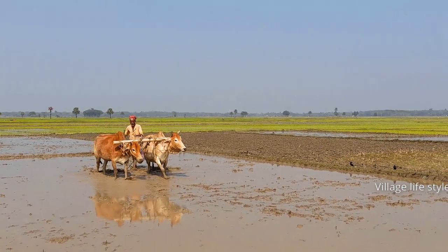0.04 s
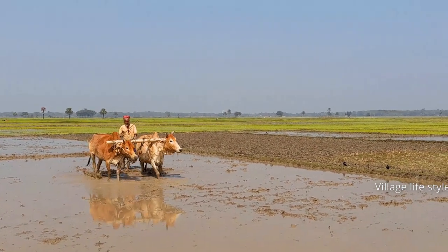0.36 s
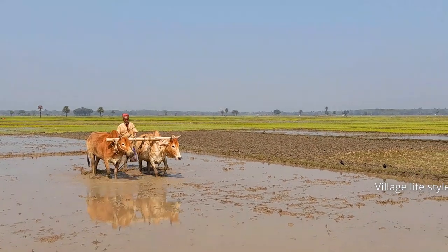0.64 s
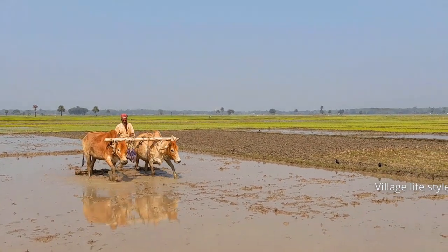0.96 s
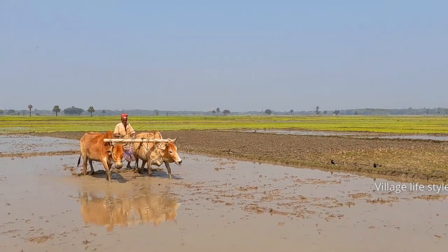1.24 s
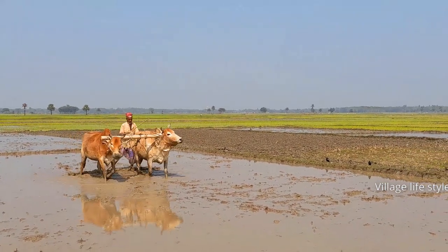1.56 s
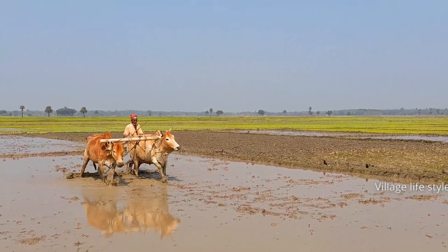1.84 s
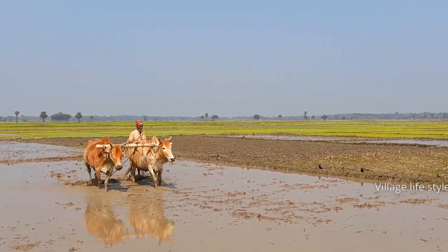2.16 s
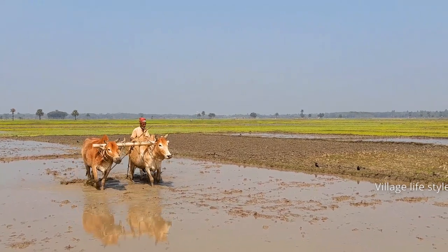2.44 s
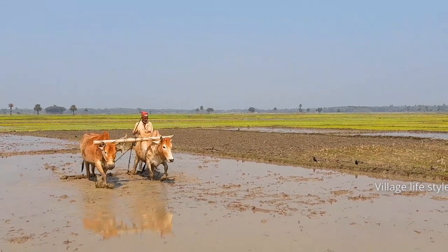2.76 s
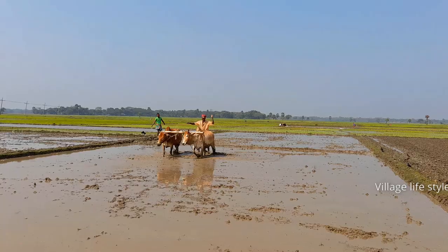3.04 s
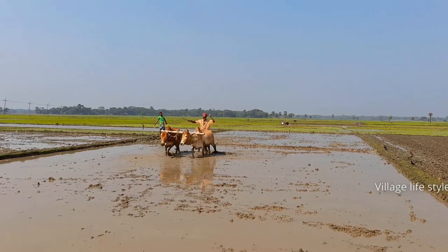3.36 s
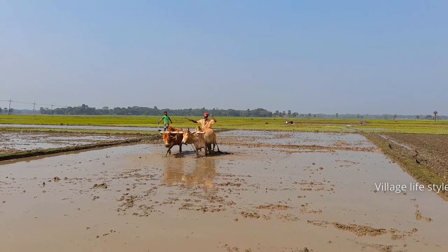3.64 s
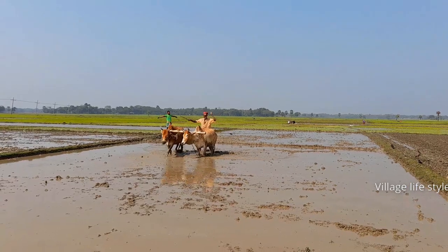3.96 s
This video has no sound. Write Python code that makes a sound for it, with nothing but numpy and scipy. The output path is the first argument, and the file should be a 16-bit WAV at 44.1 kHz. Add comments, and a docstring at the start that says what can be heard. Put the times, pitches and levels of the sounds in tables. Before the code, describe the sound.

Muddy water sloshes softly as oxen pull a plough through a flooded field, with gurgles, plops and wet slaps. Light wind brushes the microphone; after a split-second dropout it rumbles much harder, and wood knocks once.

```python
"""Oxen ploughing a flooded field

Oxen drag a plough through water, some way off to the left, while wind buffets the microphone.
Each hoof stirs up a gurgle of ringing bubbles and a patter of drops; now and then a big bubble plops
or mud slaps. After a split second of silence the scene goes on from a second spot, where the wind
rumbles much harder and wood knocks once."""
import sys
import numpy as np
from scipy import signal
from scipy.fft import rfft, irfft
from scipy.io import wavfile

SR = 44100
rng = np.random.default_rng(int(sys.argv[2]) if len(sys.argv) > 2 else 0)


def store_pcm(level_fs):
    """Save levels as 16-bit WAV."""
    pcm = np.round(np.clip(level_fs, -1, 1) * 32767).astype(np.int16)
    wavfile.write(sys.argv[1], SR, np.atleast_2d(pcm).T)


N = 176400
T = np.arange(N) / SR
FREQS = np.arange(N // 2 + 1) * SR / N
GAP_START_S, SECOND_SPOT_S = 3.063, 3.092


def flooded_field():
    """Direct water sound reaches the left side first; scattered splashing differs on the two sides."""
    # Small bubbles in the spray, larger ones in the gurgle. Each row: pitch in Hz, relative level in dB.
    ping_sizes = [(1000, -3), (1600, 4), (2600, -3), (3700, -2), (6500, -2), (8000, -5)]
    blub_sizes = [(330, 1), (500, 1), (760, 1), (1100, 2), (1300, -8)]
    # Diffuseness of the sloshing. Each row: frequency in Hz, scattered over direct in dB.
    scatter = [(400, -4.5), (750, -6.5), (2000, -3.5), (2900, 6), (3800, -7), (5300, 6), (6400, 15),
               (8500, 20), (15000, 30)]
    # Head start of the direct sound on the left. Each row: frequency in Hz, phase lead in radians.
    lead = [(300, 0), (700, .4), (1000, 1.1), (1300, 2.1), (1580, 1.4), (1850, 3.1), (2200, 6.2),
            (3300, 6.4), (4000, 7.8), (4700, 8.8), (6000, 11.5), (6900, 13), (9650, 21), (15500, 33)]
    # Stereo balance of the water. Each row: frequency in Hz, left over right in dB.
    tilt = [(550, 4), (800, -3), (1300, 0), (1650, -0.5), (2300, 2), (4000, -2), (5200, -8.5), (6500, 3),
            (9000, 9), (12000, -3.5), (15000, -5)]
    spray_gain, gurgle_gain = stirring()
    ahead, left, right = (sloshing(spray_gain, gurgle_gain) for _ in range(3))
    pings = spray_gain * from_db(-3) * bubble_swarm(ping_sizes, per_s=170, cycles=40)
    blubs = gurgle_gain * from_db(-2.5) * bubble_swarm(blub_sizes, per_s=55, cycles=18.6)
    share = from_db(per_bin(scatter))
    total = np.sqrt(1 + share ** 2)
    direct = rfft(ahead) / total + rfft(pings + blubs + plops() + mud_slaps())
    direct = np.array([direct, direct * np.exp(-1j * per_bin(lead))])
    scattered = rfft(np.array([left, right])) * share / total + rfft(mist() + splashes())
    return irfft((direct + scattered) * pan(per_bin(tilt)), N)


def stirring():
    """Envelopes of spray and gurgle: each slosh swells and dies away over a steady trickle."""
    # Hooves and plough stir the water. Each row: peak time in seconds, spray and gurgle levels
    # in relative dB, rise and decay in seconds.
    sloshes = [(0.0094, -47, -68, 0.014, 0.02), (0.145, -54, -47.5, 0.043, 0.026),
               (0.202, -52, -42, 0.017, 0.039), (0.297, -43, -47.5, 0.038, 0.022),
               (0.385, -48, -51, 0.0036, 0.12), (0.4763, -47.5, -54, 0.0091, 0.091),
               (0.585, -47, -48.5, 0.024, 0.03), (0.709, -50.5, -42, 0.019, 0.029),
               (0.7981, -46, -68, 0.066, 0.023), (0.9494, -49, -53, 0.024, 0.11),
               (1.3119, -45, -46.5, 0.039, 0.043), (1.357, -37.5, -49, 0.015, 0.017),
               (1.4094, -46, -73, 0.032, 0.053), (1.5214, -46.5, -73, 0.03, 0.08),
               (1.5805, -46, -43, 0.018, 0.19), (1.6666, -44, -46, 0.014, 0.046),
               (1.7194, -46.5, -67, 0.034, 0.065), (1.8194, -42.5, -67, 0.016, 0.079),
               (1.8692, -41.5, -62, 0.018, 0.032), (2.028, -47, -50.5, 0.06, 0.091),
               (2.1455, -51, -55.5, 0.052, 0.13), (2.2318, -44, -47, 0.043, 0.049),
               (2.288, -43, -46, 0.024, 0.1), (2.3694, -47, -46, 0.039, 0.065),
               (2.4594, -47.5, -48, 0.05, 0.1), (2.5394, -50.5, -52.5, 0.0084, 0.15),
               (2.6594, -45.5, -53, 0.013, 0.11), (2.8185, -48.5, -50.5, 0.046, 0.11),
               (2.9194, -49, -67, 0.056, 0.055), (2.9991, -47.5, -49, 0.049, 0.043),
               (3.0929, -36.5, -44.5, 0.0087, 0.037), (3.1594, -46.5, -49, 0.015, 0.23),
               (3.2755, -45.5, -47.5, 0.049, 0.21), (3.3394, -48.5, -62, 0.048, 0.056),
               (3.3894, -45.5, -45, 0.036, 0.16), (3.4735, -44.5, -54, 0.053, 0.039),
               (3.562, -41.5, -45, 0.017, 0.092), (3.5907, -43, -58, 0.017, 0.047),
               (3.668, -43, -47, 0.022, 0.12), (3.8494, -49, -44, 0.032, 0.064),
               (3.892, -40.5, -41.5, 0.006, 0.024), (3.953, -38, -51, 0.012, 0.046)]
    spray_power = gurgle_power = from_db(-60.5) ** 2  # the trickle
    for s, spray_db, gurgle_db, rise_s, decay_s in sloshes:
        fade = np.maximum((s - T) / rise_s, (T - s) / decay_s)
        swell = np.exp(-np.minimum(fade, 20))
        spray_power = spray_power + (from_db(spray_db - 8.5) * swell) ** 2
        gurgle_power = gurgle_power + (from_db(gurgle_db - 4) * swell) ** 2
    return np.sqrt(spray_power), np.sqrt(gurgle_power)


def sloshing(spray_gain, gurgle_gain):
    """Falling drops make the spray, trapped air the gurgle."""
    # Tone of the spray at each spot, and of the gurgle. Each row: frequency in Hz, gain in dB.
    first_eq = [(500, -39), (1000, 2), (1300, -6), (1620, 9), (1880, 2.5), (2150, 4), (2800, -1.5),
                (3500, 3), (4300, 4), (5200, -5.5), (6000, 0.5), (6800, -1.5), (8400, -14.5), (12000, -12),
                (15500, -21)]
    second_eq = [(500, -15), (1000, -4), (1280, 1), (1600, 10), (2000, 2.5), (2800, -1), (3700, 4.5),
                 (4500, 3.5), (5700, -12.5), (6700, -5), (8400, -19), (12000, -20), (15500, -20)]
    gurgle_eq = [(250, 10), (450, -3.5), (620, -2), (780, 0.5), (920, -5.5), (1150, -2), (1400, -12.5),
                 (2200, -10.5)]
    drops = grains(per_s=5000, spread_db=4.2, cycles=5, low_hz=883, high_hz=16700, count=24)
    drops = drops + 0.41 * unit_rms(clicks(per_s=500, spread_db=4.2))  # broad little cracks
    spray = np.where(T < SECOND_SPOT_S, colour(drops, first_eq), colour(drops, second_eq))
    bubbles = grains(per_s=850, spread_db=3.8, cycles=15, low_hz=318, high_hz=1724, count=26)
    return spray_gain * spray + gurgle_gain * colour(bubbles, gurgle_eq)


def bubble(hz, t60, attack_s=0.00073, rise_per_s=1.5):
    """A bubble rings briefly and rises in pitch as it nears the surface."""
    t = T[:int(np.clip(t60 * SR, 50, SR / 4))]
    envelope = (1 - np.exp(-t / attack_s)) * from_db(-60 * t / t60)
    return envelope / envelope.max() * np.sin(2 * np.pi * hz * t * (1 + rise_per_s * t / 2))


def bubble_swarm(sizes, per_s, cycles, spread_db=4):
    """Bubbles ring at random moments, each with a pitch and strength of its own."""
    out = np.zeros(N + SR)
    pitches, levels = np.transpose(sizes)
    for when, which, luck in rng.random((2000, 3))[:int(per_s * N / SR)]:
        hz = pitches[0] * (pitches[-1] / pitches[0]) ** which
        strength = min(-np.log(1 - luck), np.pi) - 1  # many faint, a few loud
        db = np.interp(hz, pitches, levels) + spread_db * strength
        one = bubble(hz, cycles / hz)
        out[int(when * N):][:len(one)] += from_db(db) * one
    return out[:N]


def plops():
    """Single big bubbles ring out above the gurgle."""
    # Each row: start in seconds, level in dB, starting pitch in Hz, time to fall 60 dB in seconds.
    big_bubbles = [(.05, -44.5, 322, 0.15), (.48, -46, 748, 0.17), (.583, -44, 1164, 0.056),
                   (.745, -45, 720, .035), (.949, -42, 762, 0.051), (.978, -40.5, 633, 0.06),
                   (1.034, -37.5, 1666, 0.023), (1.093, -50, 6500, 0.018), (1.358, -37, 2050, 0.011),
                   (1.708, -46, 1520, 0.071), (1.91, -41, 600, 0.038), (2.44, -47, 735, 0.1),
                   (2.461, -36, 782, 0.057), (2.952, -42, 717, 0.07)]
    out = np.zeros(N + SR)
    for s, db, hz, t60 in big_bubbles:
        one = bubble(hz, t60)
        out[int(s * SR):][:len(one)] += from_db(db) * one
    return out[:N]


def mud_slaps(contact_s=0.0015, low_t60=0.009, high_t60=0.0028):
    """A crack and a short splatter excite damped pockets in the mud: a low pair and a high one."""
    # Slaps of wet mud. Each row: start in seconds, level in dB, low and high resonance in Hz,
    # high over low in dB, time for the splatter to fall 60 dB in seconds.
    hits = [(0.126, -50, 605, 3600, -14, 0.011), (0.147, -37.5, 516, 1590, 15, 0.025),
            (.950, -47, 1230, 6250, 11, 0.025), (1.034, -36, 1200, 3540, 8.5, 0.089),
            (1.094, -37.5, 3590, 6600, 20, 0.024), (1.359, -35, 1570, 3530, -5, 0.026),
            (1.873, -35.5, 1500, 3940, 18, .05), (2.048, -37, 1300, 2330, 5, 0.11),
            (3.0944, -23.5, 1110, 3820, 8, 0.015), (3.336, -41, 675, 1600, -6, 0.037),
            (3.564, -32, 820, 4640, 5, 0.012)]
    out, t = np.zeros(N + SR), T[:SR // 10]
    low_cut = signal.butter(2, 600, "high", fs=SR, output="sos")
    crack = t == 0
    for s, db, low_hz, high_hz, high_db, t60 in hits:
        envelope = (1 - np.exp(-t / contact_s)) * from_db(-60 * t / t60)
        splatter = 0.09 * rng.standard_normal(len(t)) * envelope
        low_phase = 2 * np.pi * low_hz * t
        low = (np.sin(low_phase) - 1.46 * np.sin(1.4 * low_phase)) * from_db(-60 * t / low_t60)
        high = np.sin(2 * np.pi * high_hz * t) * from_db(high_db - 60 * t / high_t60)
        pockets = signal.fftconvolve(crack + splatter, low - high)[:len(t)]
        slap = signal.sosfilt(low_cut, pockets)
        out[int(s * SR):][:len(t)] += from_db(db) * slap / np.abs(slap).max()
    return out[:N]


def splashes(attack_s=0.00066):
    """A hoof breaks the surface and throws a sheet of spray that quickly patters out."""
    # Sheets of spray. Each row: start in seconds, level in dB, decay in seconds.
    sheets = [(.283, -56.5, 0.017), (.947, -47.5, 0.012), (1.358, -45, 0.0063), (1.52, -51, 0.0043),
              (2.226, -47, 0.014), (2.289, -56, .004), (2.918, -51, 0.0071), (3.563, -49, 0.014)]
    # Their bright tone. Each row: frequency in Hz, gain in dB.
    splash_eq = [(1500, -16), (4000, -12), (6600, 3.5), (8400, -10.5), (15500, -13)]
    envelope = 0
    for s, db, decay_s in sheets:
        age = np.maximum(T - s, 0)
        attack = 1 - np.exp(-age / attack_s)
        envelope = envelope + from_db(db) * attack * np.exp(-np.minimum(age / decay_s, 20))
    return envelope * droplets(splash_eq)


def mist():
    """The finest spray is a crackling hiss."""
    # Level of the mist at each spot. Each row: time in seconds, relative level in dB.
    first_levels = [(0.0, -65), (0.12, -74.5), (0.48, -67.5), (0.52, -76.5), (0.8, -63), (0.91, -72),
                    (0.93, -65), (1.14, -78), (1.32, -71.5), (1.9, -66), (1.97, -80), (2.02, -77.5),
                    (2.07, -72), (2.23, -67.5), (2.65, -73), (2.66, -66), (3.01, -68), (3.04, -87)]
    second_levels = [(3.12, -68), (3.374, -65.5), (3.552, -74), (3.562, -62.5), (3.756, -72),
                     (3.994, -68.5), (4.0, -63)]
    # Its airy tone. Each row: frequency in Hz, gain in dB.
    mist_eq = [(4000, -13.5), (7000, 5.5), (9500, 1), (13000, 0), (15500, -5)]
    level_db = np.where(T < SECOND_SPOT_S, in_time(first_levels)[0], in_time(second_levels)[0])
    return from_db(level_db + 3.5) * droplets(mist_eq)


def droplets(eq):
    """Tiny drops land as dense clicks, unrelated on the two sides."""
    return colour(np.array([clicks(per_s=5000, spread_db=4.2) for _ in range(2)]), eq)


def knock(start_s=3.213, left_lag_s=0.00013):
    """One hard contact rings hollow wood, perhaps the yoke; it reaches the right side first."""
    # Modes of the wood. Each row: pitch in Hz, relative level in dB, time to fall 60 dB in seconds.
    modes = [(1250, -3, .01), (1790, 0, .013), (2600, -2, .005), (4550, -2, .004)]
    band = signal.butter(2, [750, 5500], "band", fs=SR, output="sos")
    age = np.clip(T - start_s - np.array([[left_lag_s], [0]]), 0, 0.1)
    wood = sum(from_db(db - 60 * age / t60) * np.sin(2 * np.pi * hz * age) for hz, db, t60 in modes)
    return from_db(-24) * signal.sosfilt(band, wood + 1e-18)


def breeze():
    """Light air brushes the microphone, mostly on the right."""
    # Strength of the breeze. Each row: time in seconds, relative level in dB.
    levels = [(0.0, -50), (0.11, -64), (0.2, -44), (0.45, -69.5), (0.47, -52), (0.81, -50), (0.93, -40),
              (1.04, -55), (1.22, -48), (1.57, -46), (1.65, -38.5), (1.71, -49), (2.0, -53), (2.4, -52),
              (2.76, -67), (2.82, -54), (2.88, -51), (3.03, -53.5), (3.05, -66)]
    # Its soft, low tone. Each row: frequency in Hz, gain in dB.
    breeze_eq = [(20, -32), (40, -3.5), (65, 0), (130, -3), (200, -11), (350, -24.5), (600, -33),
                 (1500, -46)]
    level_db, = in_time(levels)
    return from_db(level_db + 2.5) * pan(-12) * eddies(breeze_eq, lumps_db=3)


def buffets():
    """Short puffs of wind make the microphone flutter, brighter than the breeze."""
    # Each row: peak time in seconds, level in dB, half length in seconds, left over right in dB.
    puffs = [(0.06, -52, 0.02, -14), (0.149, -43.5, 0.026, -15), (0.206, -43.5, 0.015, -15),
             (0.25, -37.5, 0.012, -9), (0.39, -49, 0.015, -13), (0.483, -47.5, 0.034, -24),
             (0.629, -39, 0.019, -2), (0.717, -39.5, 0.0089, -13), (0.838, -36.5, 0.015, 0.5),
             (0.893, -33.5, 0.0083, -3), (0.93, -49, 0.0088, 17), (1.193, -36.5, 0.0086, -6),
             (1.239, -35.5, 0.02, -3), (1.31, -35, 0.016, 4.5), (1.376, -41, 0.04, 1.5),
             (1.638, -28.5, 0.019, 2.5), (1.686, -31.5, 0.016, 1), (1.845, -39, 0.013, -3),
             (2.365, -40, 0.013, -8), (2.838, -47, 0.025, -3.5)]
    # Tone of the flutter. Each row: frequency in Hz, gain in dB.
    buffet_eq = [(25, -16), (60, -12), (130, 3.5), (220, -6), (350, -6), (520, -18.5), (900, -37.5),
                 (2000, -36), (5000, -74)]
    force = sum(from_db(db) * pan(side_db) * np.exp(-np.minimum(((T - s) / half_s) ** 2, 20))
                for s, db, half_s, side_db in puffs)
    return force * eddies(buffet_eq, lumps_db=2.5)


def gale():
    """Hard wind rumbles on the microphone and swings from side to side."""
    # Gusts. Each row: time in seconds, relative level in dB, pan to the left in dB.
    gusts = [(3.11, -36, -4), (3.168, -32.5, -5.5), (3.232, -34, 0), (3.444, -31, 1.5), (3.47, -22, 11),
             (3.494, -33, 13), (3.516, -30, -6.5), (3.662, -36.5, -5.5), (3.85, -30, 2),
             (3.92, -30.5, -8.5), (3.96, -34, 1), (4.0, -40, -17)]
    # Their heavy tone. Each row: frequency in Hz, gain in dB.
    gale_eq = [(20, -40), (40, -10.5), (52, -2), (64, 4), (88, -1.5), (120, 0), (170, -9), (250, -17.5),
               (350, -26), (500, -42.5), (1200, -71)]
    # The rumble is deeper on the left. Each row: frequency in Hz, left over right in dB.
    tilt = [(30, 18), (65, 1), (130, 1.5), (300, -11)]
    level_db, side_db = in_time(gusts)
    rumble = irfft(rfft(eddies(gale_eq, lumps_db=2)) * pan(per_bin(tilt)), N)
    return from_db(level_db + 6.5) * pan(side_db) * rumble


def eddies(eq, lumps_db, lumps_hz=26):
    """Turbulence: noise with a lumpy level, unrelated on the two sides."""
    sides = []
    for _ in range(2):
        noise = rng.standard_normal(N)
        lumps = unit_rms(irfft(rfft(rng.standard_normal(N)) / (1 + (FREQS / lumps_hz) ** 2), N))
        sides.append(colour(noise * from_db(lumps_db * lumps), eq))
    return np.array(sides)


def open_air():
    """A faint, steady hush lies under everything."""
    # Tone of the hush. Each row: frequency in Hz, gain in dB.
    air_eq = [(60, -53), (300, 4.5), (700, -16), (1900, -25.5), (4000, -21.5), (6500, -17), (8500, -42),
              (13000, -32), (16000, -36)]
    return from_db(-61.5) * colour(rng.standard_normal((2, N)), air_eq)


def grains(per_s, spread_db, cycles, low_hz, high_hz, count):
    """Clicks dealt to resonators that ring a few cycles; even power per Hz."""
    train = clicks(per_s, spread_db)
    dealt = rng.integers(0, count, N)
    return unit_rms(sum(np.sqrt(hz) * unit_rms(ring(train * (dealt == k), hz, cycles / hz))
                        for k, hz in enumerate(np.geomspace(low_hz, high_hz, count))))


def clicks(per_s, spread_db):
    """Random clicks, many small and a few large."""
    sizes = from_db(spread_db * np.minimum(rng.exponential(1, N), 4)) * rng.choice([-1, 1], N)
    return sizes * (rng.random(N) < per_s / SR)


def ring(train, hz, t60):
    """Each click sets a damped resonance ringing."""
    radius, angle = from_db(-60 / (t60 * SR)), 2 * np.pi * hz / SR
    return signal.lfilter([0.5, 0, -0.5], [1, -2 * radius * np.cos(angle), radius ** 2], train + 1e-18)


def colour(x, eq):
    """Equalise by a (Hz, dB) curve, then scale to unit rms."""
    return unit_rms(irfft(rfft(x) * from_db(per_bin(eq)), N))


def pan(db):
    """Left and right gains, db apart, at constant total power."""
    gains = from_db(np.array([np.atleast_1d(db), -np.atleast_1d(db)]) / 2)
    return gains / np.sqrt(np.mean(gains ** 2, axis=0))


def in_time(rows):
    """Join timed rows by straight lines, one curve for each value column."""
    s, *columns = np.transpose(rows)
    return [np.interp(T, s, column) for column in columns]


def per_bin(points):
    """Read a (Hz, value) table at every frequency."""
    hz, value = np.transpose(points)
    return np.interp(np.log(np.maximum(FREQS, 1)), np.log(hz), value)


def from_db(db):
    """Decibels to gain."""
    return 10 ** (np.asarray(db) / 20)


def unit_rms(x):
    """Scale to unit rms."""
    return x / np.sqrt(np.mean(x ** 2) + 1e-20)


def scene():
    """Water, mud and a knock in open air; light wind at the first spot, a gale at the second."""
    air, water = open_air(), flooded_field()
    light_wind, hard_wind = breeze(), gale()
    wind = np.where(T < SECOND_SPOT_S, light_wind + buffets(), hard_wind)
    return water + knock() + wind + air


def record(dry, fade_s=0.001, cutoff_hz=15850):
    """The sound drops out between the two spots; the top is cut steeply."""
    gate = np.clip(np.maximum(GAP_START_S - T, T - SECOND_SPOT_S) / fade_s, 0, 1)
    high_cut = signal.ellip(12, 0.1, 80, cutoff_hz, fs=SR, output="sos")
    return signal.sosfilt(high_cut, dry * gate)


dry = scene()
out = record(dry)
store_pcm(out)
```